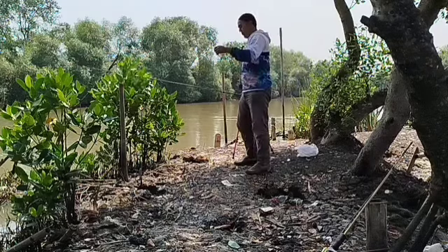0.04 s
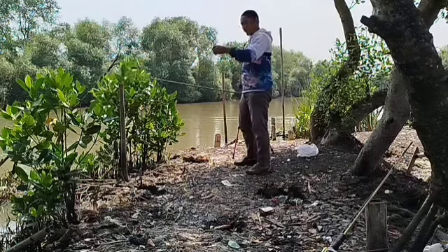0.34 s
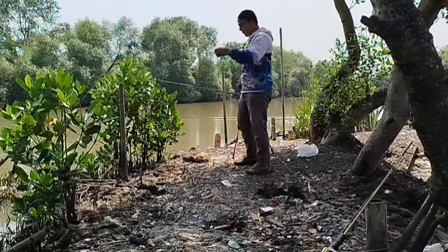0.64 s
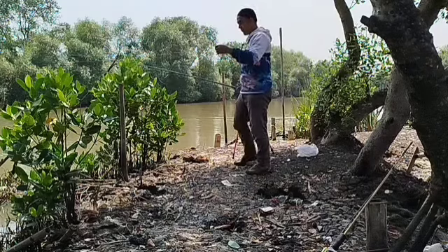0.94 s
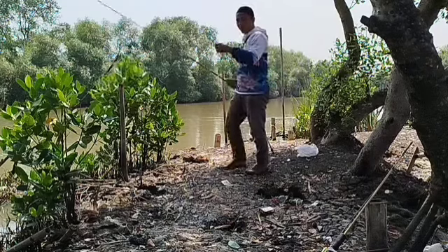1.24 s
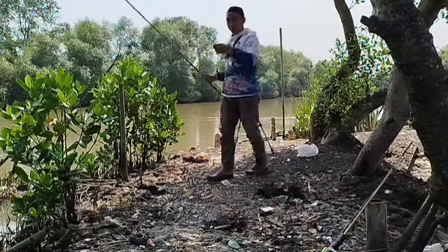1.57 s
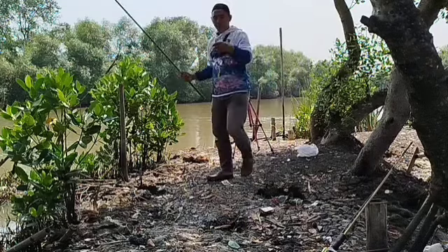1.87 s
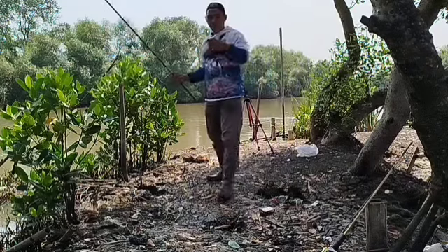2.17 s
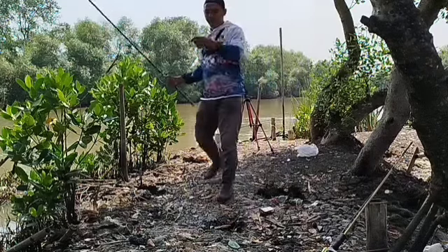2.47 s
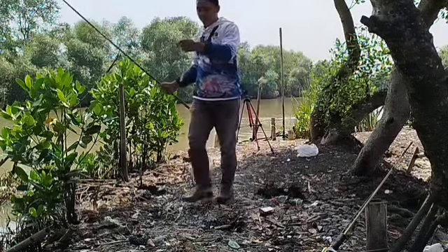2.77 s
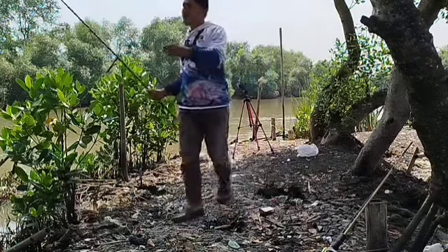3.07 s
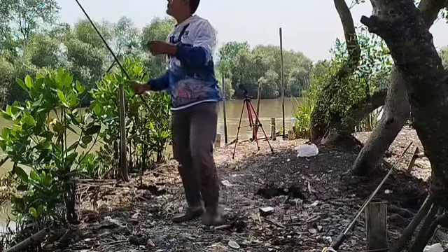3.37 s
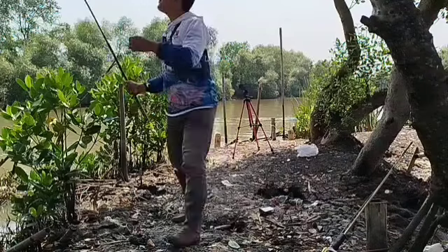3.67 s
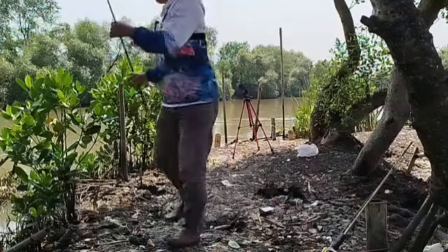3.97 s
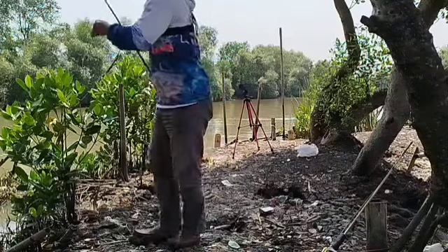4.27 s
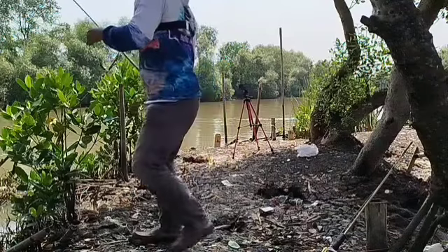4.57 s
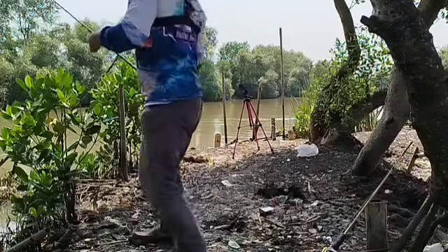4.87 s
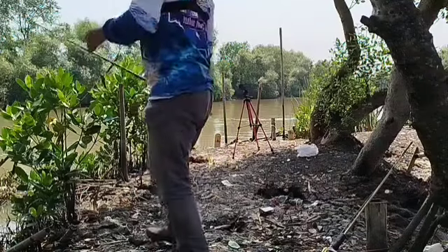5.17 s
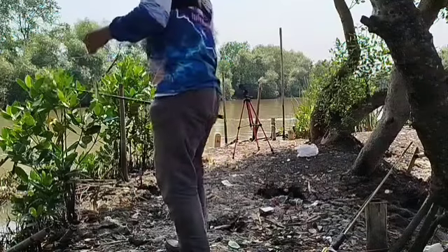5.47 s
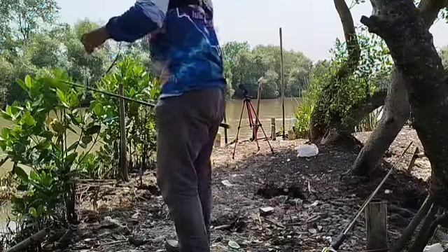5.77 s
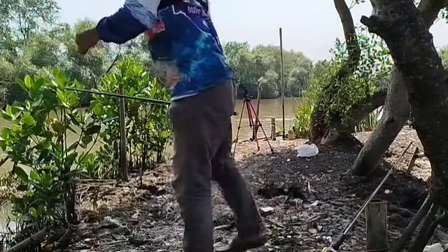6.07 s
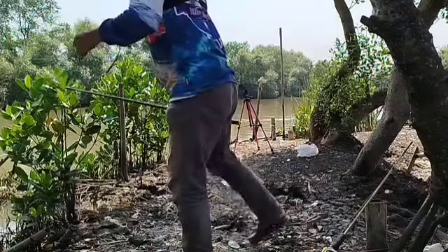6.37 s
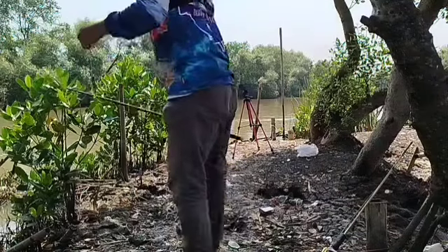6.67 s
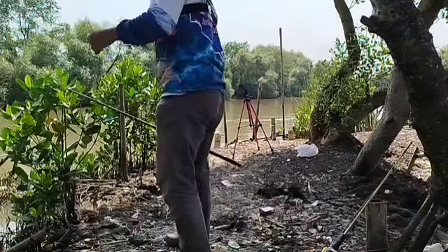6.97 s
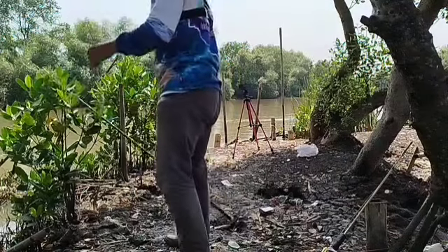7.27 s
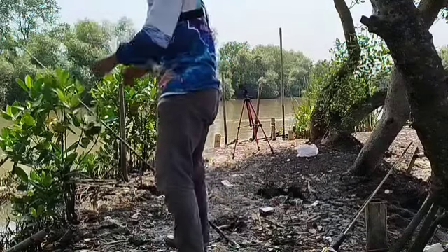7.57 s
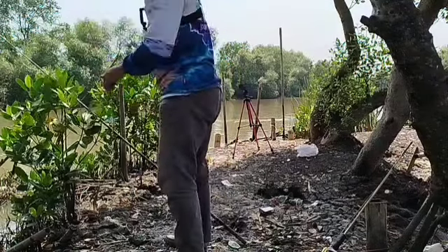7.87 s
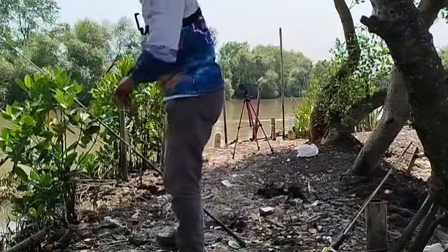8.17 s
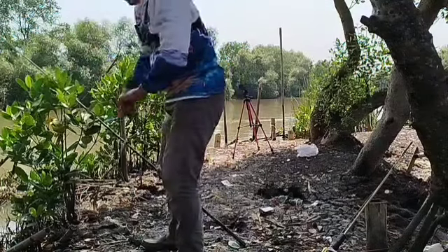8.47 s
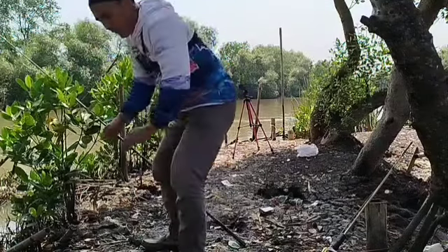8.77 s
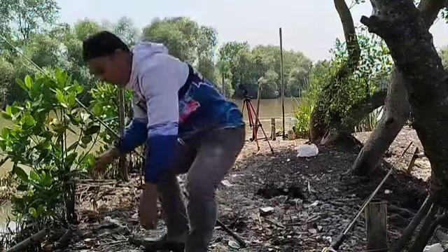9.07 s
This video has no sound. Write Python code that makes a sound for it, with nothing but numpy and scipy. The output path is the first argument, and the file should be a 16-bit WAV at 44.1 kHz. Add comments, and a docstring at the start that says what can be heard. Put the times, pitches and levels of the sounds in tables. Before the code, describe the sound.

A small bird repeats a falling whistle over a thin insect whine, while boots knock on mud, twigs snap and fishing tackle clicks once.

```python
"""A muddy, wooded riverbank. A small bird repeats a falling whistle that scatters among the trees,
over the thin whine of insects and a few faint gliding notes. An angler walks up: twigs snap, boots
knock on hollow mud and scuff dry litter, and a hard part of his tackle clicks once against its stop.
A low rumble carries from far away, under a hiss of air and foliage."""
import sys
import numpy as np
from scipy import signal
from scipy.fft import rfft, irfft, next_fast_len
from scipy.io import wavfile
from scipy.ndimage import map_coordinates

SR = 44100
rng = np.random.default_rng(int(sys.argv[2]) if len(sys.argv) > 2 else 0)


def persist_wave(psi):
    """Save psi, clipped to +-1, as 16-bit WAV."""
    counts = np.round(np.clip(psi, -1, 1) * 32767).astype(np.int16)
    wavfile.write(sys.argv[1], SR, np.atleast_2d(counts).T)


N = 402190

# spectra of grinding earth and cracking litter: f/Hz, density/dB
EARTH_SPECTRUM = [(120, -34), (190, -4.5), (290, 2.5), (470, 5.5), (650, 4), (950, -2.5), (1400, -9),
                  (2400, -10.5), (3500, -20), (6500, -32)]
CRACK_SPECTRUM = [(500, 0), (1100, -6.5), (2300, -14), (5000, -13), (12000, -21)]
# left-right correlation of far and near sounds: f/Hz, correlation
FAR_CORRELATION = [(40, 0.37), (100, 1), (400, 0.4), (1000, 0.067), (2500, 0.033), (6000, 0.013)]
NEAR_CORRELATION = [(500, 1), (1200, 0.76), (3000, 0.23), (8000, 0.18)]


def amp(db):
    """Decibels to gain."""
    return 10 ** (np.asarray(db) / 20)


def unit(x):
    """Scale to rms 1."""
    return x / np.sqrt(np.mean(x ** 2) + 1e-20)


def along(points, hz):
    """Interpolate (f/Hz, value) points on a log axis."""
    f, v = np.transpose(points)
    return np.interp(np.log(hz + 1), np.log(f + 1), v)


def bumps(rows, hz):
    """Gain of bell-shaped peaks or dips: f/Hz, width/Hz, gain/dB."""
    return amp(sum(db / (1 + (2 * (hz - centre) / width) ** 2) for centre, width, db in rows))


def wobble(rate_hz, size=N):
    """Smooth random curve, rms about 1."""
    knots = rng.standard_normal(int(size * rate_hz / SR) + 4)
    grid = np.arange(len(knots) * 8) / 8
    return np.interp(np.arange(size) * rate_hz / SR, grid, map_coordinates(knots, [grid]))


def bouts(rests_s, rest_s, ramp_s):
    """Gain 1, sinking to 0 around each rest."""
    t = np.arange(N) / SR
    to_rest_s = np.min([np.abs(t - s) for s in rests_s], axis=0)
    return np.clip((to_rest_s - rest_s / 2) / ramp_s + .5, 0, 1)


def filtered(x, response):
    """Apply a frequency response."""
    m = next_fast_len(N + SR // 4)
    return irfft(rfft(x, m) * response(np.fft.rfftfreq(m, 1 / SR)), m)[..., :N]


def add(track, s, sound):
    """Mix a sound into a track at time s."""
    start = round(s * SR)
    part = sound[max(-start, 0):max(N - start, 0)]
    track[max(start, 0):][:len(part)] += part


def rush(spectrum, correlation, grain_db=0):
    """Stereo noise, rms 1; grain_db clumps it into grains."""
    def response(hz):
        angle = np.arccos(np.clip(along(correlation, hz), -1, 1)) / 2
        return amp(along(spectrum, hz)) * [np.cos(angle), np.sin(angle)]
    white = rng.standard_normal((2, N)) * amp(grain_db * np.clip(wobble(500), -2, 2))
    mid, side = filtered(white, response)
    return unit(np.array([mid + side, mid - side]))


def trees(x, t60_s, onset_s):
    """Trunks and leaves scatter sound into a short stereo tail that changes as they sway."""
    wet, t = np.zeros((2, N)), np.arange(SR // 3) / SR
    decay = amp(-60 * t / t60_s) * (1 - np.exp(-(t / onset_s) ** 2))
    for start in range(0, N, len(t)):
        piece = x[start:start + len(t)]
        tails = rng.standard_normal((2, len(t))) * decay / np.linalg.norm(decay)
        if piece.any():
            for channel, tail in zip(wet, tails):
                add(channel, start / SR, signal.fftconvolve(piece, tail))
    return wet


def bird():
    """Each whistle flicks up softly, falls with a rough quiver and eases into a clean held note."""
    # whistles: crest t/s, knee f/Hz, final f/Hz, fall level/dB, hold level/dB
    calls = [(-.03, 2900, 2890, -42, -54), (.338, 3050, 2835, -41, -53.5), (.72, 2916, 2897, -45, -52),
             (1.1, 3010, 2888, -44.5, -49), (1.473, 2993, 2877, -42.5, -52), (1.879, 2965, 2883, -43, -52),
             (2.257, 2950, 2895, -45, -50.5), (2.656, 3000, 2880, -46.5, -49.5),
             (3.044, 2980, 2880, -46.5, -49.5), (3.424, 2990, 2970, -45.5, -51),
             (3.81, 2960, 2920, -45.5, -50), (4.204, 3010, 2925, -46.5, -48.5),
             (4.586, 2940, 2867, -47, -52), (4.977, 3010, 2890, -45.5, -49),
             (5.367, 2914, 2900, -44.5, -48.5), (5.732, 2925, 2880, -46, -52.5),
             (6.103, 2957, 2880, -43.5, -51), (6.498, 3033, 2917, -44, -47.5),
             (6.873, 2983, 2930, -42, -46.5), (7.272, 3090, 2907, -46.5, -47),
             (7.671, 2946, 2888, -44, -51), (8.072, 2957, 2870, -48.5, -52),
             (8.512, 3030, 2900, -49.5, -51.5)]
    # paths adding up among the trunks: f/Hz, width/Hz, gain/dB
    echo_peaks = [(3510, 52, -4), (3610, 76, 8), (3730, 45, -1), (3960, 32, 6)]
    start_hz, flick_s, fall_s, hold_from_s, end_s = 2408, .01496, .026, .0376, .12
    song, t = np.zeros(N), np.arange(SR // 5) / SR - flick_s  # crest at t = 0
    ramp = lambda start_s, length_s: np.clip((t - start_s) / length_s, 0, 1)
    held, progress = ramp(hold_from_s, .053), ramp(hold_from_s, end_s - hold_from_s)
    attack_db, swell_db = -11.5 * (1 - ramp(0, .018)), 4.5 * (progress - .5)
    rough = 1 - .85 * ramp(.015, .037)
    release = (1 - ramp(end_s, .011)) ** 2
    for s, knee_hz, final_hz, fall_db, hold_db in calls:
        crest_hz = 4335 + 80 * rng.standard_normal()
        flick_hz = crest_hz - (crest_hz - start_hz) * (t / flick_s) ** 2
        fall_hz = knee_hz + (crest_hz - knee_hz) * np.exp(-np.abs(t / fall_s) ** 2.185)
        pitch_hz = np.where(t < 0, flick_hz, fall_hz) + (final_hz - knee_hz) * progress
        pitch_hz *= 1 + .023 * rough * wobble(300, len(t)) + .004 * wobble(50, len(t))
        quiver_db = 3 * rough * wobble(260, len(t)) + 1.1 * wobble(60, len(t))
        level_db = (1 - held) * (fall_db - 4) + held * (hold_db + swell_db) + attack_db + quiver_db
        add(song, s - flick_s, amp(level_db) * release * np.sin(2 * np.pi * np.cumsum(pitch_hz) / SR))
    leaf_echo = [(2950, -7.5), (3300, -3), (4200, 3.5)]  # leaves favour the highs: f/Hz, gain/dB
    scattered = filtered(song, lambda hz: amp(along(leaf_echo, hz)) * bumps(echo_peaks, hz))
    left_lead_s = 40e-6
    direct = filtered(song, lambda hz: np.exp(np.outer([1j, -1j], np.pi * hz * left_lead_s)))
    return direct * amp([[1], [-1]]) + trees(scattered, t60_s=.26, onset_s=.0026)


def insects():
    """A near insect whines in long swells over a steady chorus; a fainter, lower one chirrs in bouts."""
    # chorus: f/Hz, density/dB
    chorus_spectrum = [(5500, -55), (7300, -44), (7520, -13), (7680, -4.5), (7760, -7), (8000, 0),
                       (8300, 3), (8520, 1), (8700, 1.5), (8850, -3), (8980, -14.5), (9300, -21),
                       (11000, -52)]
    # near insect's tones: f/Hz, level/dB
    tones = [(8068, -9), (8213, 0.5), (8276, -4.5)]
    # rests of the near and the lower insect: middle t/s
    near_rests = [.05, 1.01, 1.9, 2.56, 3.49, 4.46, 5.25, 6.06, 6.88, 7.81, 8.77]
    low_rests = [.51, 1.56, 2.67, 4.26, 5.46, 6.6, 7.7, 8.75]
    t = np.arange(N) / SR

    def band(centre_hz, width_hz):
        white = rng.standard_normal((2, N))
        return unit(filtered(white, lambda hz: 1 / (1 + (2 * (hz - centre_hz) / width_hz) ** 2)))
    drift_rad = lambda: .0457 * np.cumsum(rng.standard_normal((2, N)), axis=1)
    core = unit(sum(amp(db) * np.sin(2 * np.pi * hz * t + drift_rad()) for hz, db in tones))
    buzz = core + amp(-7) * band(8270, 400)
    near = amp(-58.5 + 2.5 * wobble(60)) * buzz * bouts(near_rests, rest_s=.28, ramp_s=.065)
    chorus = amp(-58 + .2 * wobble(4.11)) * rush(chorus_spectrum, FAR_CORRELATION, grain_db=1.5)
    chirr_hz = 19 + 2 * wobble(5)
    chirr_db = 3.5 * np.sin(2 * np.pi * np.cumsum(chirr_hz) / SR)
    low = amp(-72 + chirr_db) * band(7205, 70) * bouts(low_rests, rest_s=.39, ramp_s=.024)
    return near + chorus + low


def rumble():
    """A low, distant rumble crosses the water."""
    # rumble: f/Hz, density/dB
    spectrum = [(30, -14), (60, -15.5), (85, -6.5), (122, 0), (160, -3), (200, -6), (280, -9.5), (370, -16),
                (470, -17.5), (640, -18.5), (900, -21.5), (1300, -27), (2000, -27.5), (3200, -53),
                (5000, -79)]
    return amp(-56 + .18 * wobble(1) + .72 * wobble(9.1)) * rush(spectrum, FAR_CORRELATION)


def air():
    """Air and foliage hiss faintly."""
    # hiss: f/Hz, density/dB
    spectrum = [(1200, -11), (2300, 1.5), (4000, -0.5), (5300, -2), (6500, -3), (8000, -6), (9500, 2),
                (10700, -6.5), (12000, -3.5), (15500, -2)]
    return amp(-62.5 + 1.15 * wobble(2.6)) * rush(spectrum, FAR_CORRELATION)


def litter():
    """Dry litter stirs faintly throughout."""
    level_db = -70.5 + 6.5 * np.clip(wobble(14), -2, 1.5)
    return amp(level_db) * rush(CRACK_SPECTRUM, NEAR_CORRELATION, grain_db=4)


def twigs():
    """Dry sticks snap, then splinter; smaller ones tick at random while the angler walks."""
    # main snaps: t/s, level/dB, f/Hz
    snaps = [(.928, -50, 3000), (.99, -42, 1830), (1.901, -38, 4550), (2.027, -41.5, 7000),
             (2.033, -37, 3700), (2.164, -41.5, 1430), (2.926, -40, 4700), (3.536, -40, 2300),
             (3.542, -43, 9500), (3.742, -41.5, 1190), (3.93, -46, 2570), (4.485, -34, 1290),
             (4.748, -31.5, 1750), (6.266, -41, 3770), (7.462, -34, 1980), (7.476, -36.5, 1250),
             (7.932, -41, 2030), (8.663, -50, 1190), (8.82, -49, 11000)]
    walk_from_s, walk_s, ticks_per_s, low_hz, high_hz, splinter_s = 1.9, 4.6, 11, 890, 6560, .013
    track, t = np.zeros(N), np.arange(SR // 50) / SR
    ticks = [(walk_from_s + walk_s * when, -59 + 6.5 * force ** 2, low_hz * (high_hz / low_hz) ** pitch)
             for when, force, pitch in rng.random((round(ticks_per_s * walk_s), 3))]
    for s, db, hz in snaps + ticks:
        bursts = rng.standard_normal((2, len(t))) * amp(-60 * t / .016)
        snap, splinter = signal.lfilter(*signal.butter(2, [hz * .5, hz * 1.3], "band", fs=SR), bursts)
        add(track, s, amp(db - .5) * snap / np.abs(snap).max())
        add(track, s + splinter_s * rng.random(), amp(db - 3.5) * splinter / np.abs(splinter).max())
    return track + amp(-5) * trees(track, t60_s=.1, onset_s=.004)


def steps():
    """A boot lands in grit on hollow mud: a crack, a dead knock, a soft low push from the ground."""
    # landings: t/s, level/dB, body f/Hz, relative push level/dB
    landings = [(1.401, -46, 650, -20), (3.014, -30.5, 440, -28), (3.681, -38.5, 540, -9),
                (3.93, -42, 508, -22), (4.248, -29.5, 1020, -4.5), (4.439, -36.5, 820, -24),
                (4.484, -23.5, 793, -28), (4.74, -32, 1050, -26), (4.748, -21.5, 930, -4.5),
                (5.416, -31.5, 810, -1), (6.013, -26.5, 567, -14), (6.056, -24, 330, -33),
                (6.151, -29.5, 405, -22), (6.245, -32, 545, -28), (6.252, -29.5, 543, -28),
                (7.461, -33.5, 495, -24), (8.325, -36.5, 557, -22)]
    modes = [(.52, -4.5, 6), (1.03, 4.5, 5.5), (1.6, -10, 9)]  # f/body f, level/dB, t60/body cycles
    push_hz, push_t60_s, crack_t60_s, grit_rise_s, grit_fall_s = 130, .056, .016, .0066, .0086
    (knocks, pushes, cracks, grit), t = np.zeros((4, N)), np.arange(SR // 10) / SR
    press = np.concatenate([np.exp(-t[::-1] / grit_rise_s), np.exp(-t / grit_fall_s)])
    push = amp(-60 * t / push_t60_s) * (1 - np.exp(-t / .0072)) * np.sin(2 * np.pi * push_hz * t)
    for s, db, body_hz, push_db in landings:
        cycles, detunes = body_hz * t, np.exp(.13 * rng.standard_normal(3))
        knock = sum(amp(mode_db - 60 * cycles / t60) * np.sin(2 * np.pi * ratio * detune * cycles)
                    for (ratio, mode_db, t60), detune in zip(modes, detunes))
        knock *= 1 - np.exp(-t / .0017)
        add(knocks, s, amp(db - 3) * knock / np.abs(knock).max())
        add(pushes, s, amp(db + push_db) * push)
        add(cracks, s, amp(db - 14.5 - 60 * t / crack_t60_s))
        add(grit, s - t[-1], amp(db - 19.5) * press)
    crunch = cracks * rush(CRACK_SPECTRUM, NEAR_CORRELATION)
    crunch += grit * rush(EARTH_SPECTRUM, NEAR_CORRELATION, grain_db=4)
    return knocks + pushes + crunch + amp(-9) * trees(knocks, t60_s=.045, onset_s=.0021)


def scuffs():
    """A sliding sole grinds earth and crushes dry leaves in a spray of tiny ticks."""
    # slides: peak t/s, rise/s, fall/s, earth level/dB, crackle level/dB
    slides = [(1.81, 0.055, 0.13, -70, -60), (2.2, 0.065, 0.5, -68, -64), (2.99, 0.13, 0.15, -66.5, -56.5),
              (3.74, 0.04, .1, -59, -58), (4.756, 0.012, 0.033, -59, -49.5),
              (5.42, 0.087, 0.22, -60.5, -57), (6.036, 0.14, 0.041, -40, -55),
              (6.245, 0.24, 0.061, -47.5, -58), (7.485, 0.037, 0.065, -59, -47.5),
              (7.94, 0.025, 0.11, -68, -59.5), (8.9, 0.034, 0.06, -60.5, -59.5)]
    # crushed leaves: f/Hz, density/dB
    leaf_spectrum = [(600, -14), (1500, 2), (3000, -2.5), (5000, -2), (7000, -5), (9000, -4.5),
                     (15000, -16)]
    (earth, crackle), t = np.zeros((2, N)), np.arange(N) / SR
    for s, rise_s, fall_s, earth_db, crackle_db in slides:
        push = np.sin(np.pi / 2 * np.interp(t, [s - rise_s, s, s + fall_s], [0, 1, 0]))
        earth += amp(earth_db) * push ** 1.16
        crackle += amp(crackle_db) * push
    ticks = amp(2 * wobble(45)) * rush(leaf_spectrum, NEAR_CORRELATION, grain_db=4.5)
    return earth * rush(EARTH_SPECTRUM, NEAR_CORRELATION, grain_db=3.2) + crackle * ticks


def faint_glides():
    """Faint gliding notes and one thin, very high squeak."""
    # glides: t/s, length/s, start f/Hz, end f/Hz, level/dB
    glides = [(2.108, .067, 4020, 4000, -65.5), (8.33, .14, 14200, 14900, -71),
              (8.806, .033, 3700, 4500, -66), (8.95, .083, 1680, 1780, -63.5)]
    track = np.zeros(N)
    for s, length_s, start_hz, end_hz, db in glides:
        pitch_hz = np.linspace(start_hz, end_hz, int(length_s * SR) + 2)
        add(track, s, amp(db) * np.hanning(len(pitch_hz)) * np.sin(2 * np.pi * np.cumsum(pitch_hz) / SR))
    return track


def tackle():
    """A small hard part snaps against its stop; the crack spreads among the trunks."""
    # click: t/s, level/dB
    clicks = [(5.091, -14.5)]
    # modes of the part: f/Hz, level/dB, t60/s
    modes = [(2630, -47, .007), (5160, -23, 0.0079), (8120, -4, 0.0065), (8660, -20, 0.012),
             (10200, -0.5, 0.001), (12800, -24, .003)]
    (rings, cracks), t = np.zeros((2, N)), np.arange(SR // 20) / SR
    ring = sum(amp(db - 60 * t / t60_s) * np.sin(2 * np.pi * hz * t) for hz, db, t60_s in modes)
    for s, db in clicks:
        add(rings, s, amp(db) * ring / np.abs(ring).max())
        add(cracks, s, amp(db - 12 - 60 * t / .004) * rng.standard_normal(len(t)))
    cracks = signal.lfilter(*signal.butter(2, [3400, 9200], "band", fs=SR), cracks)
    return rings + cracks + trees(amp(-11) * rings + cracks, t60_s=.16, onset_s=.003)


def scene():
    """Everything heard on the bank."""
    bank = bird() + insects() + rumble() + air() + litter()
    return bank + twigs() + steps() + scuffs() + faint_glides() + tackle()


def record(dry):
    """Two microphone ports colour the treble differently; deep bass and the top are cut."""
    # port imbalance: f/Hz, left minus right/dB
    port_tilt = [(1500, 0.5), (3000, 0.5), (6000, -0.5), (7800, -4), (8300, -6.5), (8850, 1), (9500, 8),
                 (11000, 1), (15000, 1.5)]
    # hollows in the microphone response: f/Hz, width/Hz, gain/dB
    port_dips = [(6215, 110, -19.5), (12100, 370, -13)]
    top_hz = 15550
    ports = lambda hz: amp(np.outer([.5, -.5], along(port_tilt, hz))) * bumps(port_dips, hz)
    low_cut = lambda hz: amp(along([(40, -22), (64, -17), (76, -34), (95, 1)], hz))
    return filtered(dry, lambda hz: ports(hz) * low_cut(hz) * (hz < top_hz))


dry = scene()
out = record(dry)
persist_wave(out)
```